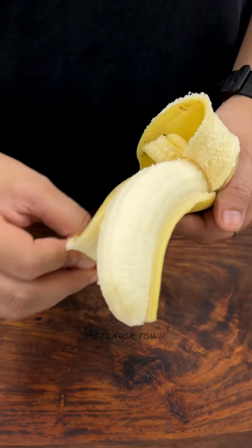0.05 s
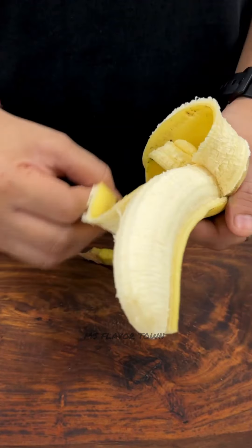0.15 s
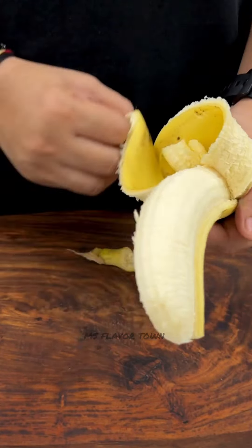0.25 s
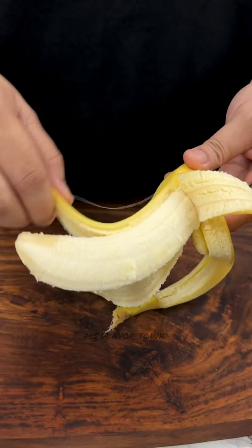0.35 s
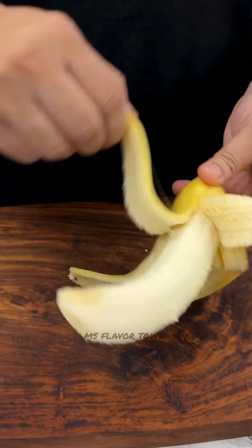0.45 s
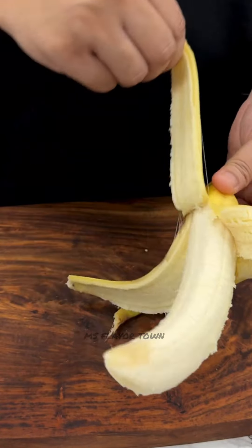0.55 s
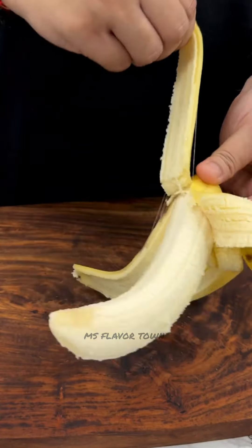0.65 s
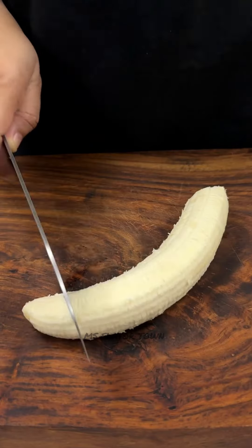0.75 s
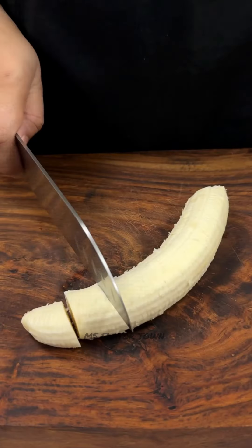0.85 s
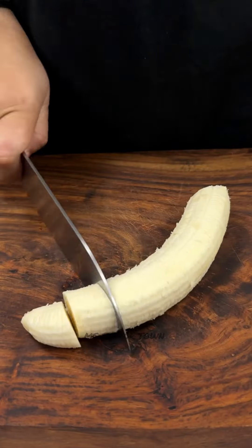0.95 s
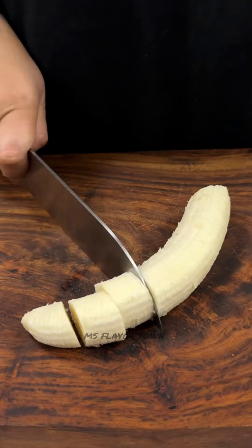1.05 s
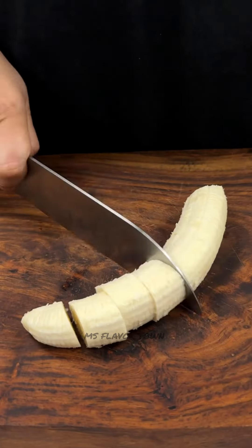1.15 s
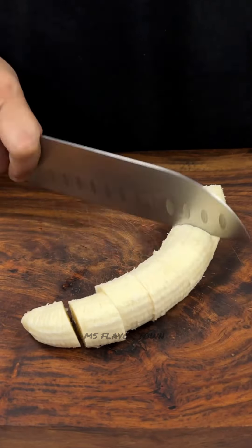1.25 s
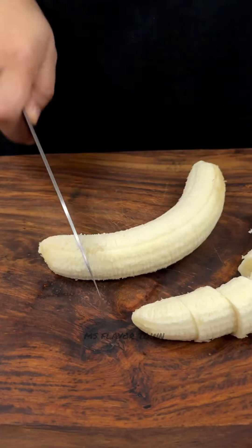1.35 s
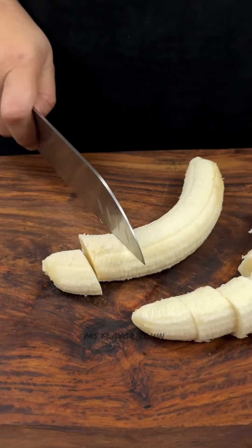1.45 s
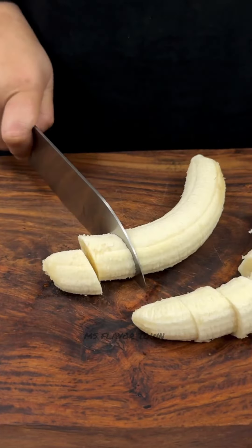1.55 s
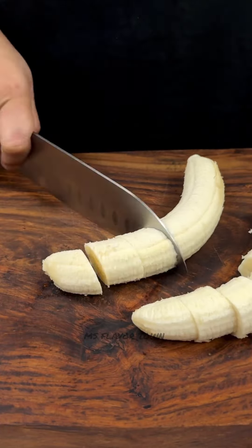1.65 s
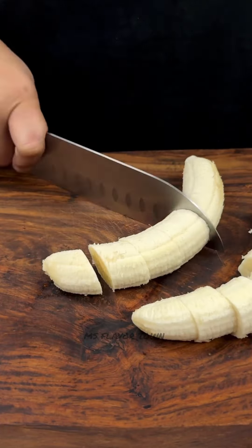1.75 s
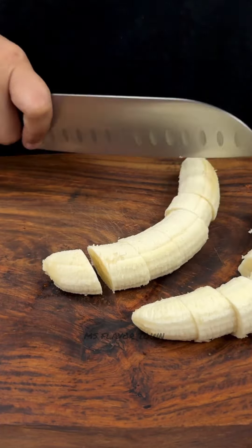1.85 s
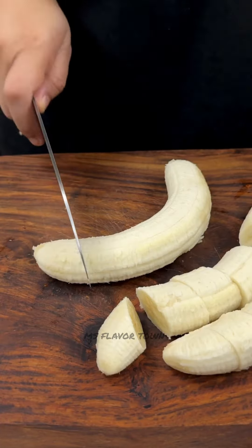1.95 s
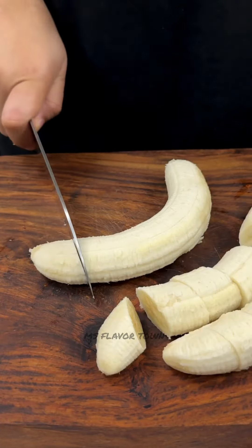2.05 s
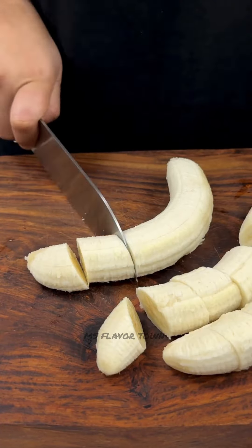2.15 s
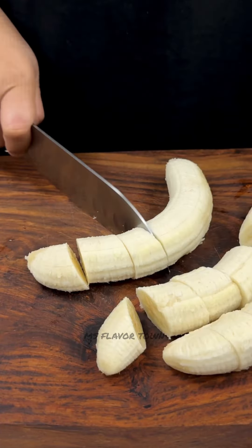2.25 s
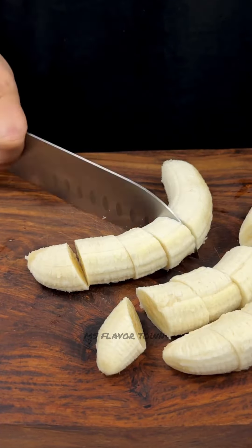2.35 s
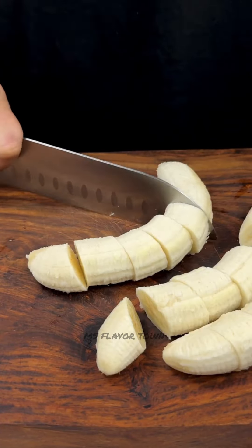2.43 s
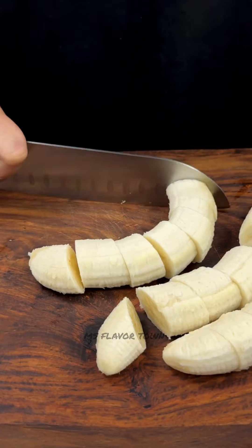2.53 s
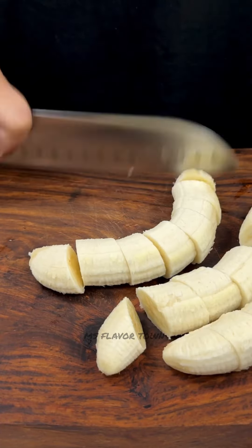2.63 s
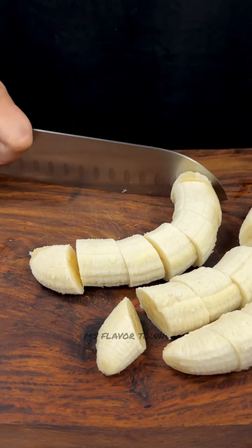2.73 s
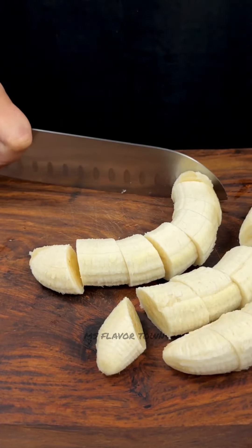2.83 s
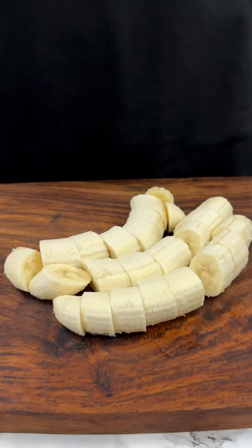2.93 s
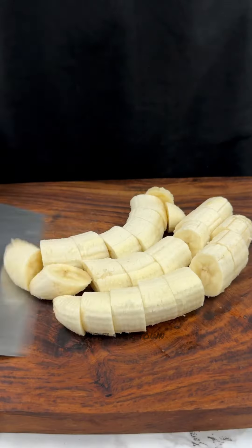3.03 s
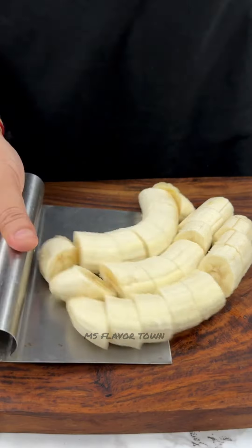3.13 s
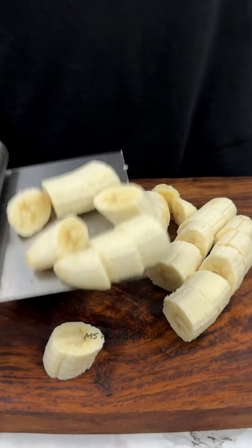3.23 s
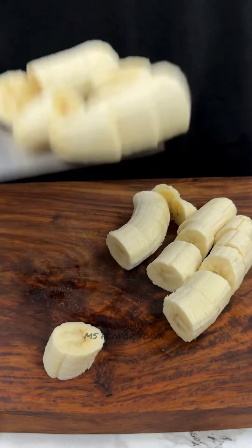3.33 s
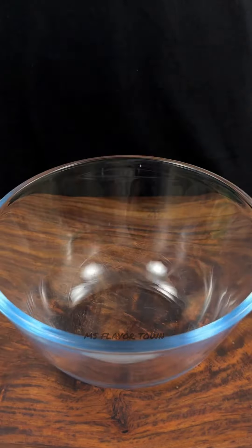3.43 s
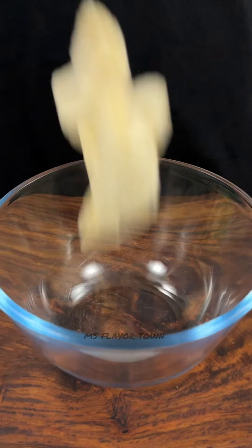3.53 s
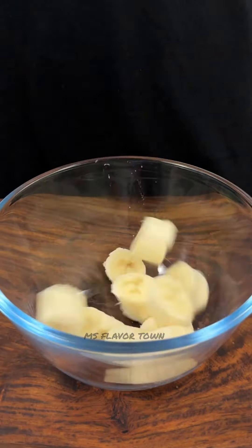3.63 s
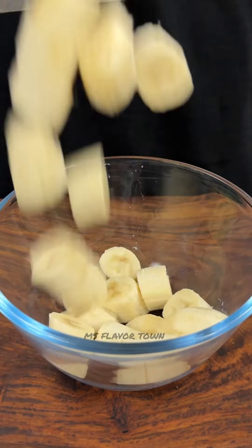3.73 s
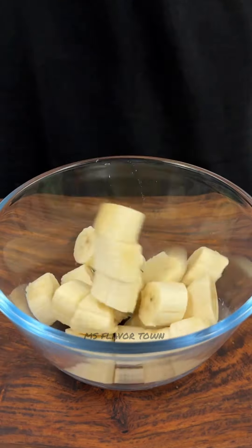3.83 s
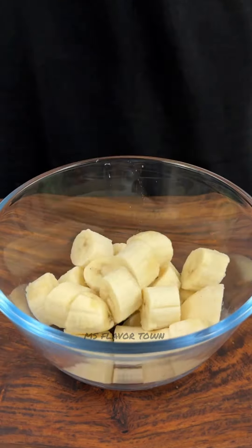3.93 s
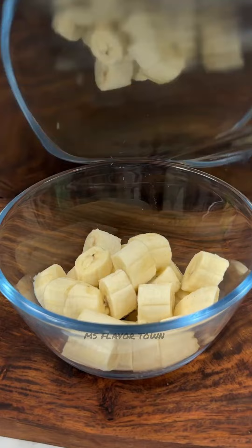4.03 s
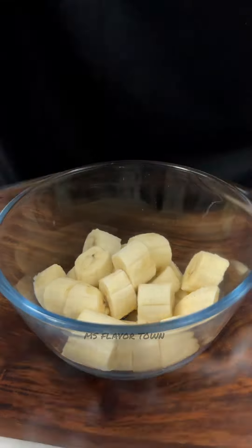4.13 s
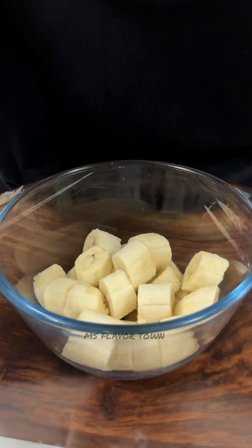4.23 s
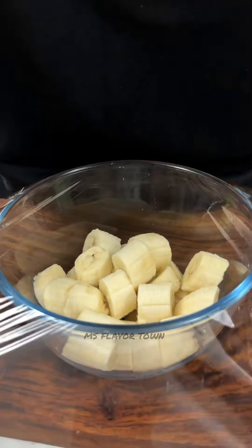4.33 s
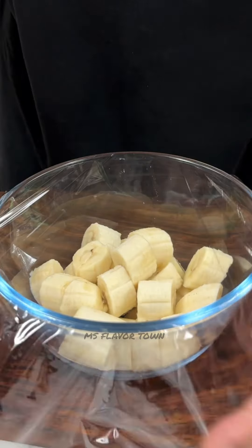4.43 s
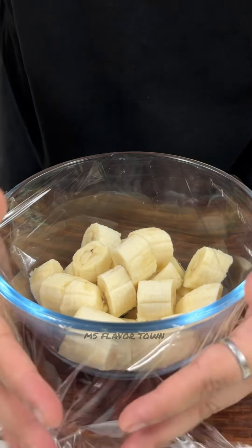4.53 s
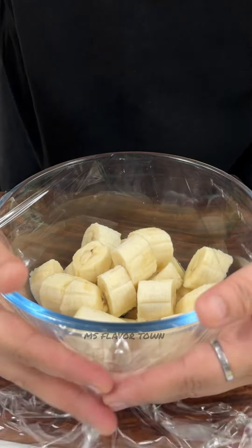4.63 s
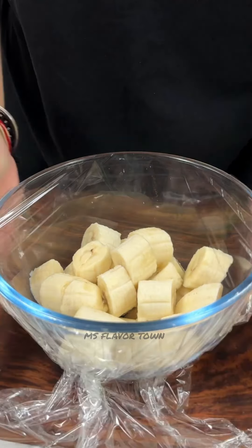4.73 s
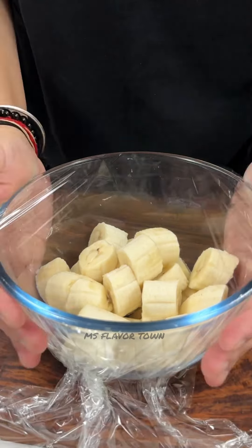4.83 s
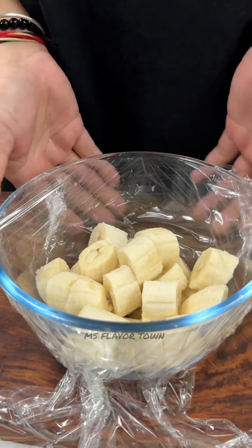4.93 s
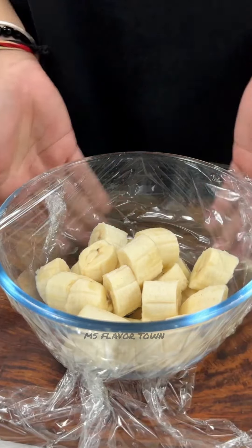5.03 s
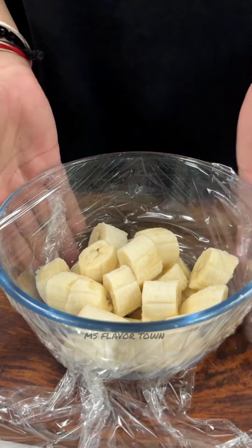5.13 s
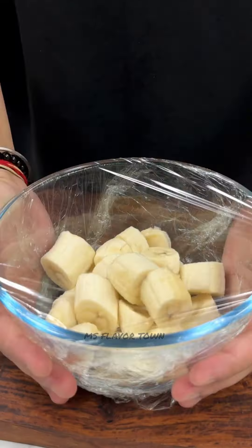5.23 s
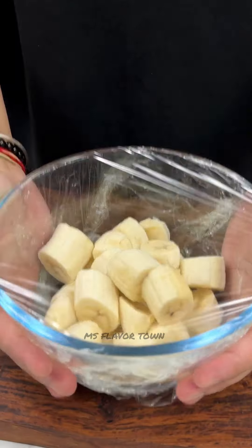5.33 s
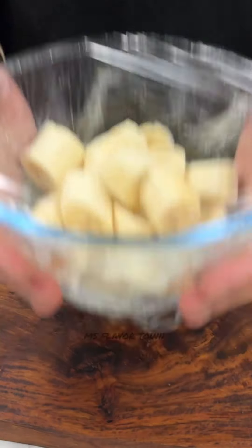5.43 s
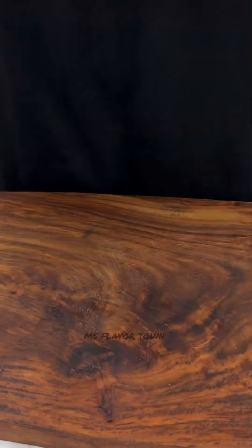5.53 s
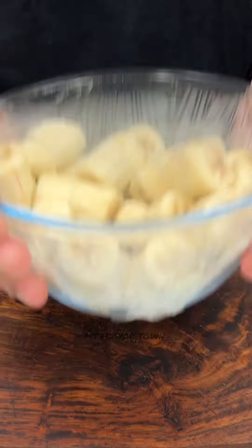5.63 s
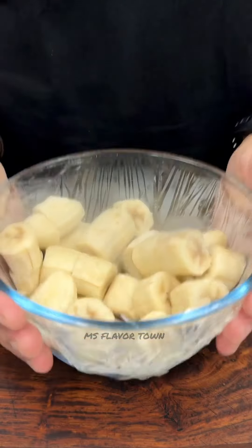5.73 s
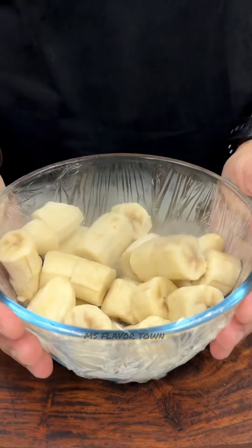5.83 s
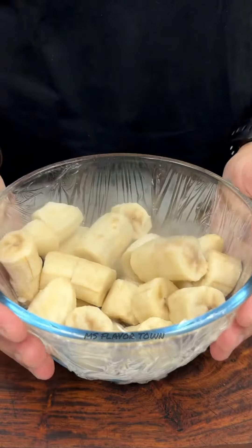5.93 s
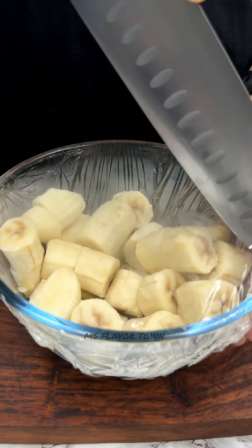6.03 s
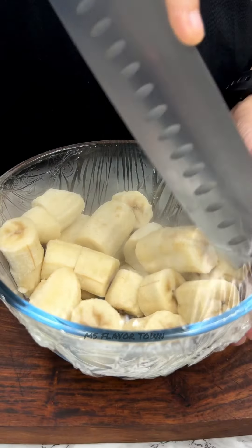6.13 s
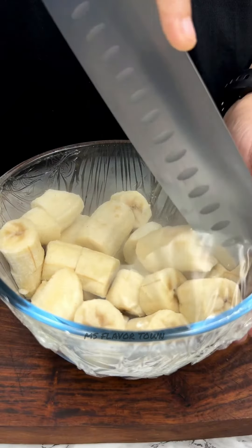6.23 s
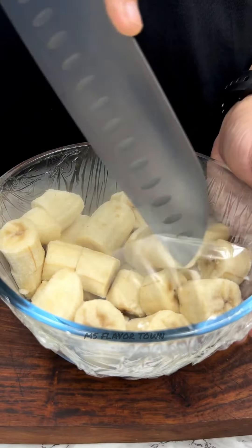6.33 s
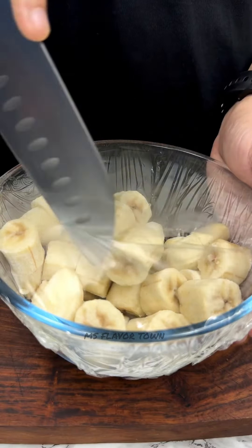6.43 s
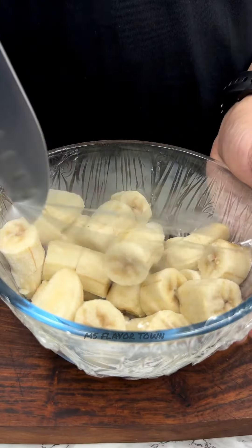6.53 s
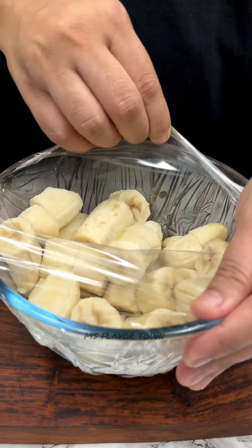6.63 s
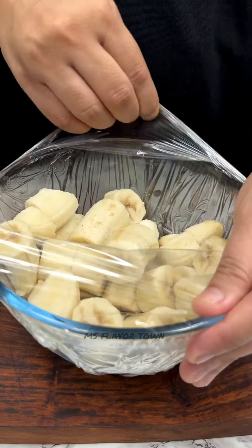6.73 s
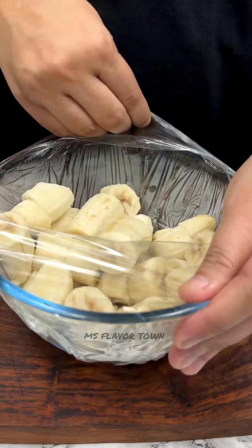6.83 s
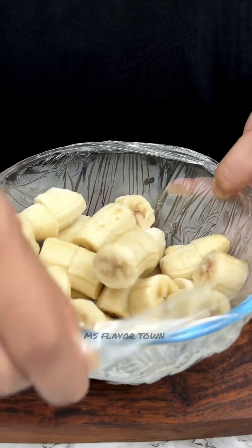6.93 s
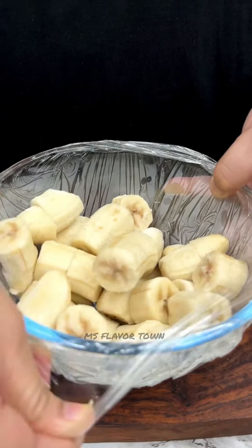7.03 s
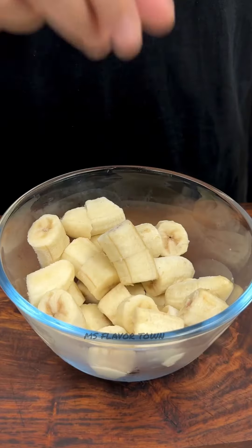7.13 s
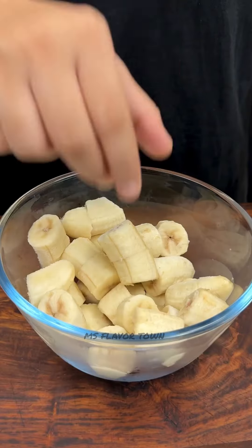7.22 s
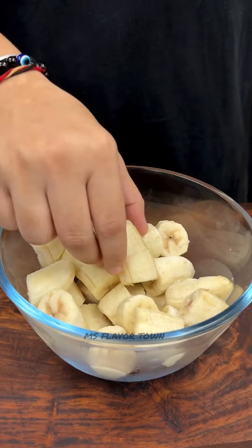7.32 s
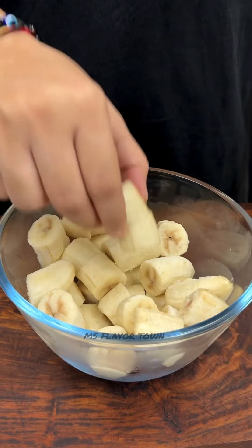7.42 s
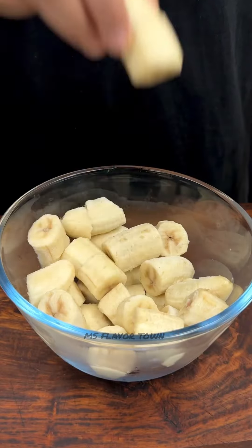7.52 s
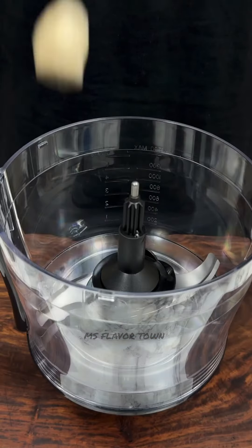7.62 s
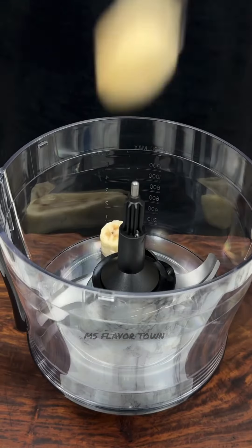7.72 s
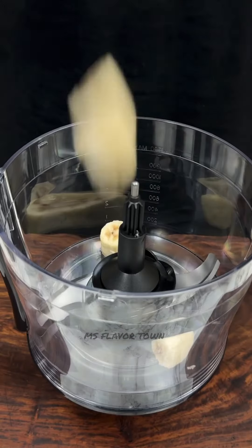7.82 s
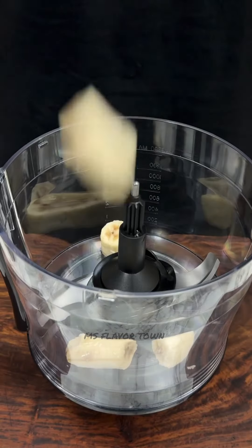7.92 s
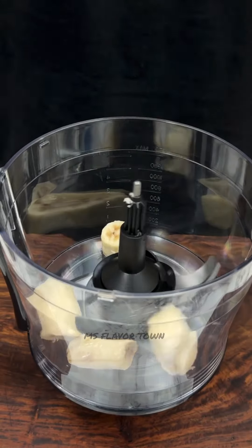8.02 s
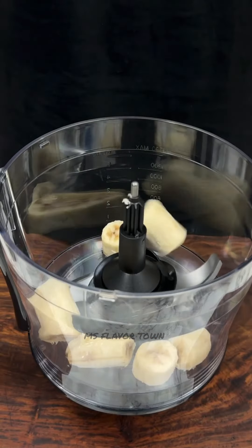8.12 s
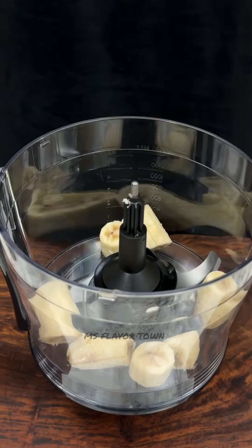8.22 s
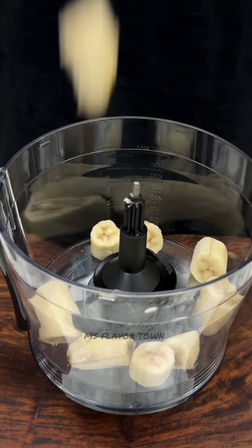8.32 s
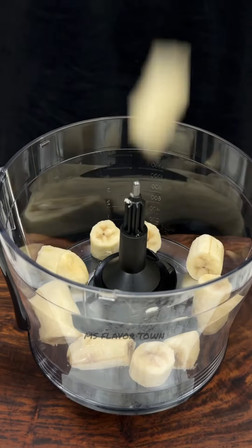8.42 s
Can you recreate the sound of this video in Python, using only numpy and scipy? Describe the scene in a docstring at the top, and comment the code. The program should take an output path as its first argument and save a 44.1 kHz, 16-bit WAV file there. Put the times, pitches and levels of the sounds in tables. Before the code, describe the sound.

In a small hard kitchen, quick clipped cuts: peel tearing, loud fast chopping on wood, glass bowl thumps, cling film snaps, frozen pieces clacking in plastic.

```python
"""A small, hard kitchen: bananas are peeled, chopped on a wooden board, scooped up, tipped into a glass bowl,
wrapped in cling film, unwrapped and dropped into a plastic jug. Blows excite decaying modes; tearing, sliding and
film are dense random clicks shaped by filters; a decaying noise response gives the reverberation. Short shots end
abruptly, most with a rising room tone, and most play faster than life, which raises the blows' resonances and the
echoes. The loudest blows clip."""
import sys
import numpy as np
from scipy import signal
from scipy.fft import rfft, irfft, next_fast_len
from scipy.io import wavfile
from scipy.ndimage import uniform_filter1d

SR = 44100
rng = np.random.default_rng(int(sys.argv[2]) if len(sys.argv) > 2 else 0)


def bounce(signal):
    """Save signal as a 16-bit WAV file at the path given by the first command-line argument."""
    frames = np.transpose(np.atleast_2d(signal))
    limited = np.clip(frames, -1, 1)
    pcm = np.round(limited * 32767).astype(np.int16)
    wavfile.write(sys.argv[1], SR, pcm)


def gain_from_db(level_db):
    """Convert decibel levels to linear amplitude factors (20 dB per decade)."""
    decades = np.asarray(level_db, float) / 20
    return 10 ** decades


N = 373527
T = np.arange(N) / SR
LEFT_RIGHT = np.array([[1], [-1]])  # signs of a side signal in the two channels


def colour(x, points, speed=0.96):
    """Linear filtering: spectrum drawn through (frequency [Hz], level [dB]), frequencies times speed; rms 1."""
    hz, db = np.transpose(points)
    size = x.shape[-1]
    f = np.arange(size // 2 + 1) * SR / size + 1
    gain = gain_from_db(np.interp(np.log(f / speed), np.log(hz), db))
    y = irfft(rfft(x) * gain, size)
    return y / np.sqrt(np.mean(y ** 2))


def grains(rate, spread_db):
    """Shot noise: random clicks at a mean rate [1/s], many small and a few large, none huge."""
    size_db = spread_db * np.minimum(rng.exponential(size=N), 3.5)
    return (rng.random(N) < rate / SR) * rng.uniform(-1, 1, N) * gain_from_db(size_db)


# unhurried shots: (start [s], cut [s], playback speed [x], room tone at start [dB], room tone at cut [dB])
UNHURRIED_SHOTS = [(0.008, 0.331, 1.2, -34, -34.5), (0.371, 0.735, 1.3, -35, -33.5),
                   (2.922, 3.201, 1.5, -60.5, -36.5), (3.198, 3.468, 0.7, -64.5, -36),
                   (3.47, 3.734, 1.2, -66, -21), (3.729, 4.053, 1.3, -53, -50),
                   (4.079, 4.392, 1.4, -52.5, -36.5), (4.449, 4.742, 1.4, -53, -39.5),
                   (4.749, 4.972, 1.3, -53.5, -30), (4.987, 5.228, 1.3, -57, -38.5),
                   (5.285, 5.593, 1.07, -64, -38.5), (5.703, 6.016, 1, -65.5, -20),
                   (6.023, 6.314, 1.8, -74, -40), (6.28, 6.571, 1.6, -57, -40),
                   (6.648, 6.911, 1.5, -74, -42), (6.904, 7.148, 1.5, -61, -44)]
# room tone of each chopping shot and of each jug shot: (at start [dB], at cut [dB])
CHOP_TONE = (-53, -41.5)
JUG_TONE = (-69.5, -33)
# ends of the jug shots: (time [s])
JUG_SHOT_CUTS = [7.732, 7.818, 7.904, 7.988, 8.082, 8.17, 8.236, 8.314, 8.412, 8.47]


def shots():
    """Time compression by shots, in order; a quick one opens just before its first blow or at the last cut."""
    chop_lead_s, jug_lead_s, jug_speed = 0.087, 0.086, 1.5  # leads are the longest run-ups to a blow
    quick = [(s - chop_lead_s, cut, speed, *CHOP_TONE) for _, speed, s, cut, *_ in strokes()]
    for before, cut in zip([0] + list(JUG_SHOT_CUTS), JUG_SHOT_CUTS):
        first = min(s for s, *_ in JUG_BLOWS if s > before)
        quick.append((first - jug_lead_s, cut, jug_speed, *JUG_TONE))
    rows = sorted(list(UNHURRIED_SHOTS) + quick, key=lambda shot: shot[1])
    return [(max(start, last[1]), *rest) for last, (start, *rest) in zip([(0, 0)] + rows, rows)]


def gestures(rows, fade_in_s=0.045):
    """Exponential growth and decay: gain of movements that swell, hold and die away, each inside its shot."""
    power = np.zeros(N)
    for s, hold, db, rise, fall in rows:
        start, cut, *_ = next(shot for shot in UNHURRIED_SHOTS if s < shot[1])
        inside = (T >= start) & (T < cut)
        t = T[inside]
        gain = gain_from_db(db + rise * np.minimum(t - s, 0) - fall * np.maximum(t - s - hold, 0))
        fade = np.minimum((t - start) / fade_in_s, 1) ** 2
        power[inside] += (gain * fade) ** 2
    return np.sqrt(power)


# room tone spectrum at natural speed: (frequency [Hz], relative level [dB])
ROOM_TONE_SPECTRUM = [(18, -52), (30, -23.5), (148, -18), (235, -24), (403, -30.5), (521, -36),
                      (624, -34.5), (691, -38), (1280, -45), (14000, -64)]


def room_tone(size, speed):
    """Stationary background noise: a common part and a weaker difference part widen the stereo image."""
    mid, side = colour(rng.standard_normal((2, size)), ROOM_TONE_SPECTRUM, speed)
    return mid + .35 * side * LEFT_RIGHT


# reverberant bands at natural speed: (frequency [Hz], relative level [dB], t60 [s], side minus mid [dB])
REVERB_BANDS = [(62.3, -19, 0.7, -17.5), (127, 8, 0.45, -32.5), (244, 9, 0.63, -18.5),
                (361.5, -4.5, 1, -10), (724, 8.5, 0.56, -0.5), (1230, 2.5, 0.68, -2), (1820, 7, 0.51, -10),
                (2820, -3, 0.56, -1.5), (4530, 1, 0.5, -1.5), (6500, -1.5, 0.61, 3.5),
                (11000, -7, 0.12, 11)]
# standing waves at natural speed: (frequency [Hz], relative level [dB], t60 [s])
STANDING_WAVES = [(120.8, -10, 0.47), (240.6, -9, 0.77), (628.3, -10.5, 0.25), (902.5, -9, 0.52)]


def kitchen(size, speed):
    """Room impulse response: silence, a first echo, then band-wise exponential decay over standing waves."""
    echo_s, echo_db, echo_spread_s = 0.01, 8, 0.0026  # at natural speed
    t = np.arange(size) * speed / SR
    f = np.log(np.arange(size // 2 + 1) * SR / size / speed + 1)
    centres = np.log(np.array(REVERB_BANDS)[:, 0])
    noise = rfft(rng.standard_normal((2, size)))
    tail = np.zeros((2, size))
    for k, (_, db, t60, side_db) in enumerate(REVERB_BANDS):
        share = np.interp(f, centres, np.arange(len(centres)) == k)
        tail += gain_from_db([[db], [db + side_db]]) * irfft(noise * share, size) * 1000. ** (-t / t60)
    for hz, db, t60 in STANDING_WAVES:
        tail[0] += gain_from_db(db) * np.sin(2 * np.pi * hz * t) * 1000. ** (-t / t60)
    late = np.maximum(t - echo_s, 0)
    # the nearest walls answer together, louder than the tail that follows
    tail *= gain_from_db(-19.0 + echo_db * np.exp(-late / echo_spread_s)) * np.sqrt(speed) * (late > 0)
    return tail[0] + tail[1] * LEFT_RIGHT


# dull rumble of things shifted on the board: (full [s], hold [s], level [dB], rise [dB/s], fall [dB/s])
BOARD_RUBS = [(3.076, 0.05, -31.5, 152.5, 150.5), (3.34, 0.133, -36, 500, 99), (3.79, 0.106, -25, 900, 57),
              (6.15, 0.067, -29.5, 505, 201.5)]
# the film tugging at the bowl: same columns; its spectrum: (frequency before scaling [Hz], relative level [dB])
BOWL_TUG = [(7.026, 0.0075, -29.5, 900, 121)]
BOWL_TUG_SPECTRUM = [(120, -22), (280, 1.5), (400, 1.5), (560, -16), (1100, -42)]


def shuffle():
    """Structure-borne friction noise: low, soft rubbing carried by the board, and one tug at the bowl."""
    rub_spectrum = [(40, -24.5), (90, 1.0), (150, 9.0), (300, -4.5), (450, -15.5), (900, -47.0)]
    rub = colour(rng.standard_normal(N), rub_spectrum)
    tug = colour(rng.standard_normal(N), BOWL_TUG_SPECTRUM)
    return rub * gestures(BOARD_RUBS) + tug * gestures(BOWL_TUG)


# skin tearing off the fruit: (full [s], hold [s], level [dB], rise [dB/s], fall [dB/s])
PEEL_PULLS = [(0.25, 0.02, -35, 41, 66), (0.6, 0.02, -37, 26, 20)]
# spectra of the tearing and of the handling rumble: (frequency before scaling [Hz], relative level [dB])
PEEL_SPECTRUM = [(350, -52), (600, -9.5), (2090, -7), (3680, -18), (6550, -13), (8620, -22.5),
                 (14900, -2.5), (16000, -25.5)]
HANDLING_SPECTRUM = [(8.8, -51), (15, -6.5), (28, 12.5), (49, 16.5), (113, 11), (177, -33), (300, -10),
                     (390, -49), (660, -120)]


def peel():
    """Fracture noise: fibres part in a fine, wide hiss while the hands rumble through the counter."""
    pull = gestures(PEEL_PULLS, fade_in_s=0.002)
    rumble = colour(rng.standard_normal(N), HANDLING_SPECTRUM) * gain_from_db(-32.5) * (pull > 0)
    wide_spectrum = [(500, 5.0), (6000, -11.0), (11000, 2.0), (15000, 0.5), (16500, -12.5)]
    wide = colour(rng.standard_normal(N), wide_spectrum) * gain_from_db(2.5)
    tear = colour(grains(12000, 0.77), PEEL_SPECTRUM)
    return (tear + wide * LEFT_RIGHT) * pull + rumble


# steel scoop sliding over wood: (time [s], lower resonances [dB], upper resonances [dB])
SCOOP_SLIDE = [(2.93, -75, -96.5), (2.958, -53, -52.5), (3.018, -12.5, -19.5), (3.044, -27, -9),
               (3.118, -17, -9), (3.202, -54.5, -50), (3.21, -73, -53)]
# resonances of the scoop: (frequency [Hz], width of each of two equal poles [Hz], relative level [dB])
STEEL_RESONANCES = [(1460, 220, -2.5), (2020, 230, 6), (3035, 790, 1.5), (4470, 800, 5.5), (5550, 740, 3.5),
                    (7860, 1200, 3), (9900, 2800, -0.5), (11700, 990, -8.5), (3060, 54, 3),
                    (4442, 35, -0.5), (4780, 84, 4), (7350, 60, -3.5), (7100, 60, 7), (8540, 50, 7),
                    (10000, 50, -2)]


def scoop():
    """Forced resonance: dense slips over the grain excite the steel; upper ones wake as it speeds up."""
    f = np.arange(N // 2 + 1) * SR / N
    slips = rfft(grains(6000, 2.0))
    slide = np.array(SCOOP_SLIDE)
    out = np.zeros(N)
    for column, upper in ((1, False), (2, True)):
        group = [row for row in STEEL_RESONANCES if (row[0] > 2700) == upper]
        body = sum(gain_from_db(db) / (1 + 1j * (f - hz) * 2 / width) ** 2 for hz, width, db in group)
        rub = irfft(slips * body, N)
        level_db = np.interp(T, slide[:, 0], slide[:, column], -120., -120.)
        out += rub / rub.std() * gain_from_db(level_db)
    return out


# film pulled, cut and rustled: (full [s], hold [s], level [dB], rise [dB/s], fall [dB/s])
FILM_PULLS = [(4.352, 0.003, -38.5, 234, 355), (4.64, 0.01, -34, 131, 194),
              (5.13, 0.085, -38.5, 192, 499.5), (5.505, 0.003, -54.5, 503, 299.5),
              (5.588, 0.01, -46, 350, 96), (6.148, 0.048, -19, 3000, 228.5),
              (6.346, 0.01, -50.5, 907, 60.5), (6.472, 0.02, -32, 260, 297), (6.52, 0.05, -48.5, 100, 100),
              (6.722, 0.1, -28.5, 506, 217.5), (6.955, 0.045, -34.5, 900, 500),
              (7.022, 0.008, -21.5, 2500, 339.5), (7.096, 0.003, -39.5, 2502, 233)]
# the taut sheet humming, same columns; at other times it follows the crackle
SHEET_HUMS = [(4.3, 0.073, -49.5, 110, 201), (6.15, 0.019, -18, 2110, 257), (6.76, 0.089, -30.5, 229, 200),
              (6.955, 0.013, -34.5, 900, 300)]
# spectrum of crackle and snaps: (frequency before scaling [Hz], relative level [dB])
FILM_SPECTRUM = [(880, -15), (1500, -39.5), (1810, -11.5), (3250, -7), (4590, -6.5), (9750, -10),
                 (13100, -11.5), (16000, -13.5)]
# single snaps of the film: (time [s], peak before panning [dB])
FILM_SNAPS = [(4.3405, -27), (4.3525, -22.5), (4.6153, -20), (5.1602, -16), (5.352, -43), (5.5024, -33),
              (6.1495, -3.5), (6.1649, 2.5), (6.1843, -6), (6.1979, 1.5), (6.352, -26.5), (6.4345, -26),
              (6.4723, -31), (6.4866, -23.5), (6.7945, -13.5), (6.8314, -6), (7.0224, -8), (7.0504, -8),
              (7.0968, -14), (7.1357, -19.5)]
# place of the film: (time [s], left minus right [dB])
FILM_PLACE = [(4.0, 2), (5.0, 1.5), (5.6, 7.5), (6.14, 12), (6.2, 10), (6.33, 8), (6.9, 10.5), (6.95, 6)]


def film():
    """Buckling noise: creases crackle in bunches, the taut sheet hums near 1 kHz, a few creases snap."""
    clumps_per_s, clump_db, sheet_share_db = 90, 2.2, -16
    pull = gestures(FILM_PULLS)
    hold = int(SR / clumps_per_s)
    steps = np.repeat(rng.standard_normal(N // hold + 1), hold)
    clumps = uniform_filter1d(steps, hold // 2)[:N]
    creases = grains(6000, 4.7) * gain_from_db(clump_db * clumps)
    crackle = pull * colour(creases, FILM_SPECTRUM)
    hum = colour(creases, [(400, -25.5), (800, -12.5), (1200, -8.0), (1800, -9.5), (2600, -46.5)])
    sheet = np.hypot(gain_from_db(sheet_share_db) * pull, gestures(SHEET_HUMS)) * hum
    snaps = np.zeros(N)
    for s, snap_db in FILM_SNAPS:
        burst = colour(rng.standard_normal(400), FILM_SPECTRUM) * np.exp(-np.arange(400) / 60.0)
        i = int(s * SR)
        snaps[i:i + 400] += gain_from_db(snap_db) * burst / np.abs(burst).max()
    pan_db = np.interp(T, *np.transpose(FILM_PLACE))
    return crackle + sheet + snaps, gain_from_db(np.array([pan_db, -pan_db]) / 2)


def strike(near, send, s, modes, db, room_db, contact_ms, crack_db=0., click_db=20., low_hz=60.44,
           far_cutoff=12.):
    """Modal impact: a noisy crack over short modes, duller for a longer contact, at its shot's speed to the cut."""
    scatter_db = 3.5  # how much each blow favours some modes
    _, cut, speed, *_ = next(shot for shot in shots() if s < shot[1])
    t = np.arange(max(int((cut - s) * SR), 1)) * speed / SR
    hz, mode_db, t60 = np.transpose(modes)[:, :, None]
    chance = rng.standard_normal((2, len(modes), 1))
    hz = np.minimum(hz * (1 + .025 * chance[0]), .45 * SR / speed)
    rise = np.minimum(t / (0.00044 + 0.0019 * contact_ms), 1)
    partials = gain_from_db(mode_db + scatter_db * chance[1]) * np.sin(2 * np.pi * hz * t) * 1000. ** (-t / t60)
    ring = partials.sum(0) * rise
    crack = gain_from_db(crack_db) * rng.standard_normal(16384)[:len(t)] * np.exp(-t / 0.0053) * rise
    # from afar the crack is one even click
    click = gain_from_db(click_db) * np.sqrt(1 / speed) * (t == 0)
    # one-pole low-pass whose cutoff falls with contact time
    hold = np.exp(-2 * np.pi * 1000 * speed / (2.93 * max(contact_ms, .02) * SR))
    close, far = signal.lfilter([1], [1, -hold], [ring + crack, ring + click])
    # off axis a second pole, far_cutoff times higher, dulls the top further
    far = signal.lfilter([1], [1, -hold ** far_cutoff], far)
    # a small body gives off little bass
    close, far = signal.lfilter(*signal.butter(2, low_hz * speed, "high", fs=SR), [close, far])
    i = int(s * SR)
    near[i:i + len(t)] += gain_from_db(db) * close / np.abs(close).max()
    send[i:i + len(t)] += gain_from_db(db + room_db) * far / np.sqrt(speed * np.sum(far ** 2))


# fruit, hands and board against the glass bowl: (time [s], blow [dB], room re blow [dB], contact [ms])
BOWL_BLOWS = [(3.58, -9.5, 0.5, 1.1), (3.615, -4.5, -19, 1), (3.624, 9, 2.5, 0.63), (3.633, 8, -7.5, 0.38),
              (3.648, -5, -2, .8), (3.658, -16, -3, 0.47), (3.671, -11, 4, 0.47), (3.682, -13.5, -8.5, 1.1),
              (3.695, -14.5, -6, 2.3), (3.778, -24, -3, 1.3), (3.803, -13, -4, 0.1),
              (3.859, -2.5, -2.5, 0.51), ]
# the full bowl set down on the board, same columns
BOWL_SET_DOWN = [(5.786, -24.5, 7, 0.24), (5.804, 4.5, 4, 0.18), (5.818, 0, 3, 0.3)]
# a knuckle on the rim of the bowl, same columns
KNUCKLE_TAPS = [(4.813, -22.5, 3, 0.052), (4.828, 2.5, -7, 0.21), (4.864, -9, -4, 0.9)]
# modes of the bowl at natural speed: (mean frequency [Hz], mean level before contact filter [dB], t60 [s])
BOWL_MODES = [(123.5, -9, 0.069), (240.5, -21.5, 0.02), (605, -12, 0.041), (880, -1.5, 0.016),
              (1330, 5, .009), (3610, -2, 0.015), (5940, -9, .03)]


def bowl(near, send):
    """Shell vibration: the glass rings at each blow, brighter and with a longer treble at the rim."""
    for s, *how in BOWL_BLOWS:
        strike(near, send, s, BOWL_MODES, *how, crack_db=-2.0, click_db=33.5, low_hz=90.0, far_cutoff=2.8)
    for s, *how in BOWL_SET_DOWN:
        strike(near, send, s, BOWL_MODES, *how, crack_db=-3.5, click_db=33.5, low_hz=165.0, far_cutoff=1.5)
    treble_ring, tilt_db_per_octave = 2.8, 2.5
    rim = [(hz, db + tilt_db_per_octave * np.log2(hz / 1000), t60 * (treble_ring if hz > 2000 else 1))
           for hz, db, t60 in BOWL_MODES]
    for s, *how in KNUCKLE_TAPS:
        strike(near, send, s, rim, *how, crack_db=10.5, click_db=28.5, low_hz=131.0, far_cutoff=4.1)


# frozen pieces into the jug: (time [s], blow [dB], room re blow [dB], contact [ms],
# frequency that the struck spot favours at natural speed [Hz])
JUG_BLOWS = [(7.682, 7.5, -6.5, 0.086, 1330), (7.76, -17.5, 1.5, 0.32, 298), (7.783, 6, -6.5, 0.18, 920),
             (7.863, 1.5, -0.5, 0.29, 320), (7.872, 6, -4, 0.4, 320), (7.881, 3, -5, 0.17, 740),
             (7.946, 4.5, -7, .7, 334), (7.964, 8.5, -6, 0.09, 810), (8.027, 4.5, -5.5, 0.45, 610),
             (8.051, -8, 6, 0.52, 294), (8.127, 2.5, -2, 0.14, 777), (8.209, 5, -5, 0.45, 300),
             (8.223, -3.5, -4, 0.31, 310), (8.287, 4.5, -6, 0.18, 1235), (8.365, 3, -4, 0.97, 284),
             (8.384, -2.5, -2.5, .3, 270), (8.397, -23, -16, 0.31, 750), (8.448, 0, -2.5, .15, 750),
             (8.457, 2, -4, 0.089, 755), (8.465, -0.5, -5, .15, 750)]
# modes of the jug at natural speed: (mean frequency [Hz], mean level before spot and contact [dB], t60 [s])
JUG_MODES = [(280, -21, 0.034), (352, -7.5, 0.052), (740, -2.5, 0.02), (1315, 0.5, 0.014),
             (1576, 1.5, .025), (2760, -2, 0.021), (3210, -3.5, 0.036)]


def jug(near, send):
    """Mode selection by striking point: each spot favours nearby modes.
    A very faint click comes a few milliseconds before hard landings."""
    click_lead_s, faint_db, hard_ms = 0.0037, -23, 0.21
    favour_db, favour_octaves = 11, 0.22
    faint_clicks = [(s - click_lead_s, db + faint_db, room_db, contact_ms, spot_hz)
                    for s, db, room_db, contact_ms, spot_hz in JUG_BLOWS if contact_ms < hard_ms]
    for s, *how, spot_hz in list(JUG_BLOWS) + faint_clicks:
        spot = [(hz, db + favour_db * np.exp(-(np.log2(hz / spot_hz) / favour_octaves) ** 2), t60)
                for hz, db, t60 in JUG_MODES]
        strike(near, send, s, spot, *how, crack_db=0.5, click_db=30.0, low_hz=127.0, far_cutoff=3.2)


# knife on board, one shot a stroke, one list a run of strokes; the last is a single stroke at natural speed:
# (time [s], cut [s], blow [dB], first touch of the heel [dB], room re blow [dB])
KNIFE_STROKES = [
    [(0.7981, 0.868, 8, 10, -9.5), (0.9391, 1.01, 19.5, 11, -9.5), (1.0371, 1.108, 13, -9, -12),
     (1.1458, 1.198, 21, 8.5, -14), (1.2291, 1.271, -6.5, 24, -19), (1.2959, 1.337, 7.5, 0, -9)],
    [(1.3987, 1.468, 13.5, 1, -5), (1.5393, 1.617, 13.5, 4.5, -13.5), (1.66, 1.722, 11.5, 16, -14.5),
     (1.7569, 1.812, 15.5, 8.5, -17), (1.839, 1.887, 12.5, 7, -11.5), (1.9167, 1.956, 4.5, 18, -13.5)],
    [(1.9973, 2.091, -8, 12, -1), (2.1363, 2.23, 7, -1.5, -10.5), (2.2559, 2.335, 15, 16, -11.5),
     (2.3546, 2.423, 3, -4.5, -9.5), (2.4403, 2.499, 7.5, 7.5, -6.5), (2.513, 2.569, 11.5, -16, -14),
     (2.5821, 2.639, 14, -6, -5.5)],
    [(2.6795, 2.873, 6.5, -11, -4)],
]
# for each list of strokes: (playback speed of its first stroke [x])
FIRST_SPEEDS = (1.3, 1.3, 1.3, 1.0)
# for each list of strokes: (contact [ms])
KNIFE_CONTACTS = (0.1, 0.12, 0.11, 0.16)


def strokes():
    """Progressive time compression: strokes with contact and speed, which grows stroke by stroke in a run."""
    speed_step, top_speed = 0.31, 3.0
    return [(contact, min(first + k * speed_step, top_speed), *row)
            for contact, first, run in zip(KNIFE_CONTACTS, FIRST_SPEEDS, KNIFE_STROKES)
            for k, row in enumerate(run)]


# modes of the board at natural speed: (mean frequency [Hz], mean level before contact filter [dB], t60 [s])
BOARD_MODES = [(213.5, -20, 0.01), (930, 3.5, 0.0051), (1120, -12.5, 0.027), (1740, -14.5, 0.024),
               (2876, 20, 0.0043), (4180, 18, 0.002), (5020, 19, 0.00089)]


def knife(near, send):
    """Plate vibration: the heel of the knife touches the board, then the edge strikes.
    A faint hiss swells briefly before each stroke."""
    heel_lead_s, lead_hiss_db, lead_hiss_s = 0.0064, -23, .005  # times at natural speed
    flat_db_per_ms = 120.5  # a longer, flatter contact sends more plain thud to the room
    for contact, speed, s, _, db, heel_db, room_db in strokes():
        heel = s - heel_lead_s / speed
        # the hiss swells up to the heel's touch, then holds until the stroke
        ahead = (T > heel - .04) & (T < s)
        swell = np.exp(np.minimum(T[ahead] - heel, 0) * speed / lead_hiss_s)
        near[ahead] += gain_from_db(lead_hiss_db) * swell * np.diff(rng.standard_normal(4096))[:ahead.sum()]
        strike(near, send, heel, BOARD_MODES, heel_db, room_db, .1, crack_db=-6.5, click_db=14.0)
        strike(near, send, s, BOARD_MODES, db, room_db, contact, crack_db=-10.0,
               click_db=5.5 + flat_db_per_ms * contact)


def scene():
    """Superposition of direct sound, room and room tone. Each shot stops within milliseconds; a faint murmur
    carries on briefly after it."""
    linger_db, linger_s, fade_s = -23.5, 0.0099, 0.0021
    near, send = np.zeros((2, N))
    bowl(near, send)
    jug(near, send)
    knife(near, send)
    steel, (wrap, pan) = scoop(), film()
    send = send + gain_from_db(-26) * steel + gain_from_db(-23.5) * wrap
    direct = near + steel + peel() + shuffle() + wrap * pan
    out = np.zeros((2, N))
    for start, cut, speed, from_db, to_db in shots():
        a, b = int(start * SR), min(int(cut * SR), N)
        end = min(b + 2048, N)
        t = T[a:end]
        size = next_fast_len(end - a, True) // 2 * 2 + 2
        wet = signal.fftconvolve(kitchen(size, speed), send[None, a:b], axes=1)[:, :end - a]
        tone_gain = gain_from_db(np.interp(t, [start, cut], [from_db, to_db]))
        tone = tone_gain * room_tone(size, speed)[:, :end - a]
        linger = gain_from_db(linger_db) * np.exp(-(np.maximum(t - cut, 0) / linger_s) ** 2)
        fade = np.clip((cut - t) / fade_s, 0, 1)
        out[:, a:end] += np.maximum(fade, linger) * (wet + tone)
        out[:, a:b] += direct[:, a:b] * fade[:b - a]
    return out


def top_cut(x):
    """Nothing passes above the cut-off."""
    return signal.sosfilt(signal.butter(12, 16390, fs=SR, output="sos"), x)


def record(dry):
    """Band limitation and overload: the microphone lacks deep bass and dulls the top; peaks clip at full scale."""
    bass_cut = signal.butter(2, 30., "high", fs=SR, output="sos")
    dull_top = signal.butter(1, 14000., fs=SR, output="sos")
    heard = signal.sosfilt(np.vstack([bass_cut, dull_top]), dry)
    clipped = np.clip(heard, -1, 1)
    # a steep low-pass ends the band
    mix = signal.sosfilt(signal.ellip(8, .2, 60, 15900, fs=SR, output="sos"), clipped)
    return top_cut(mix)


dry = scene()
out = record(dry)
bounce(out)
```